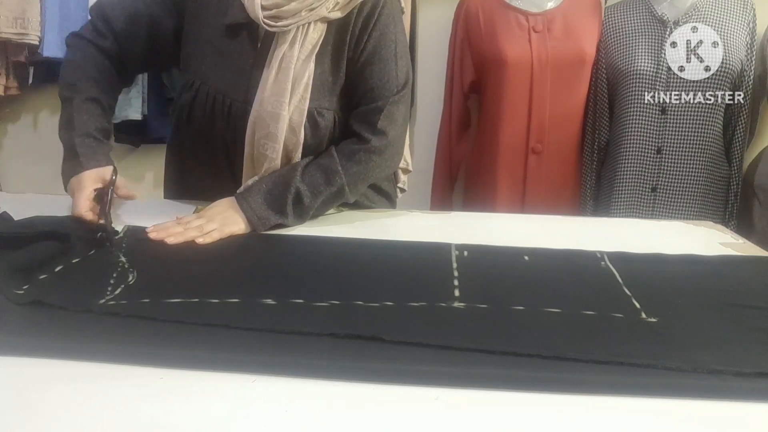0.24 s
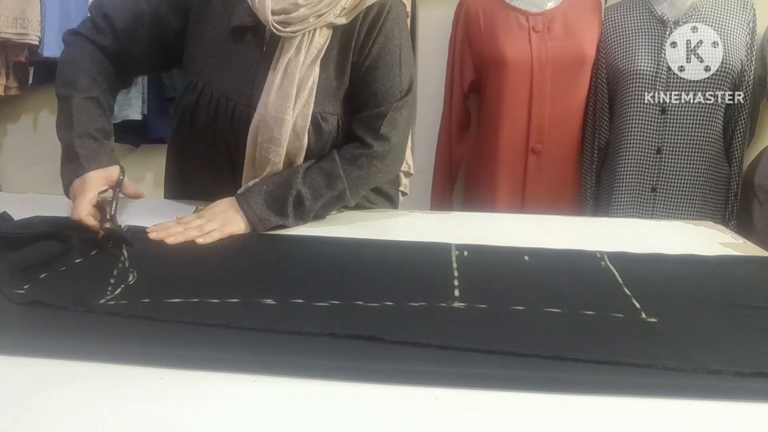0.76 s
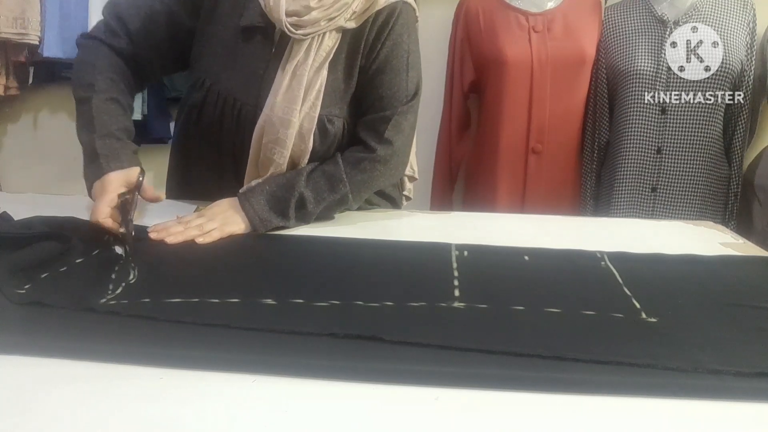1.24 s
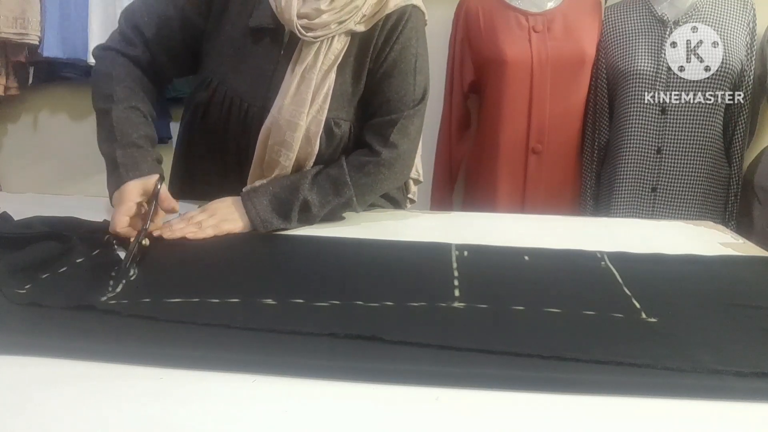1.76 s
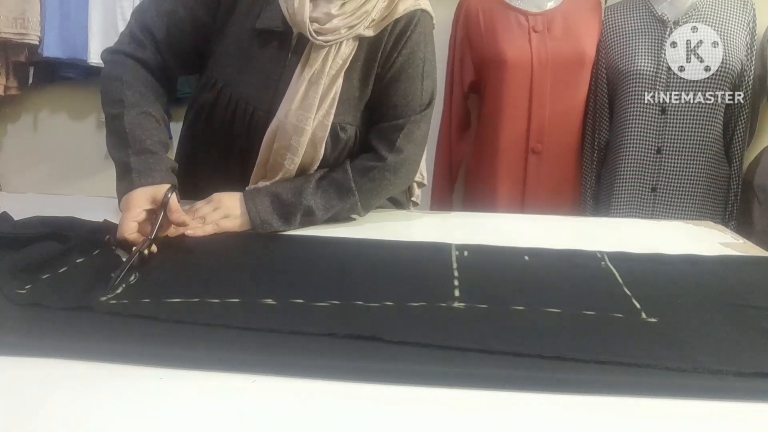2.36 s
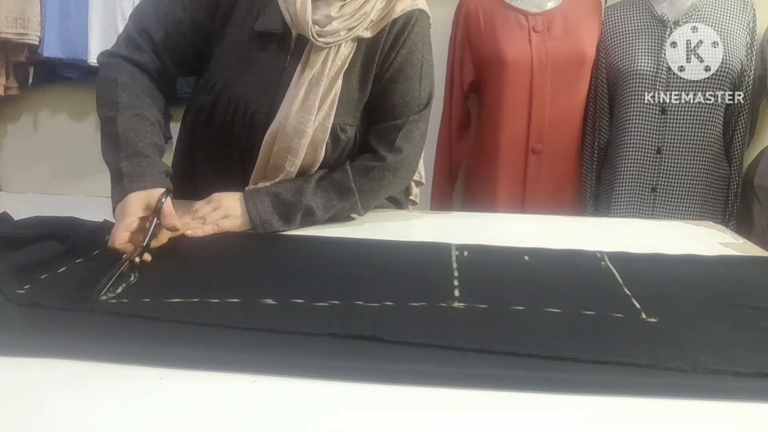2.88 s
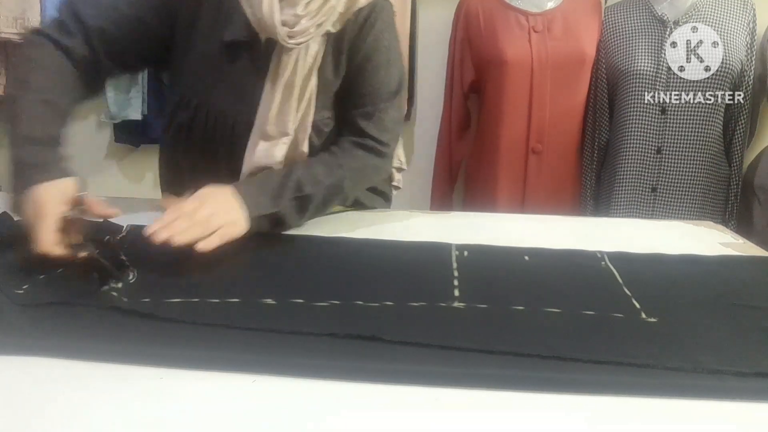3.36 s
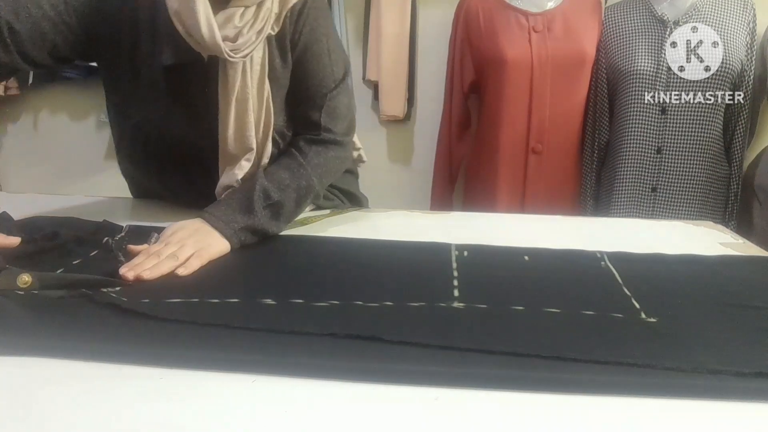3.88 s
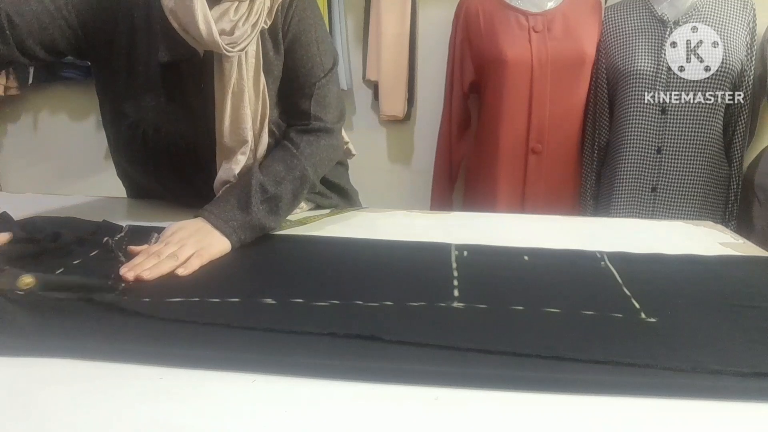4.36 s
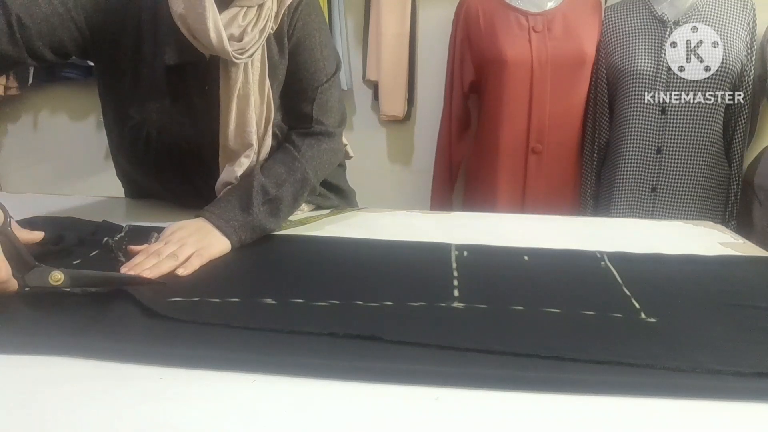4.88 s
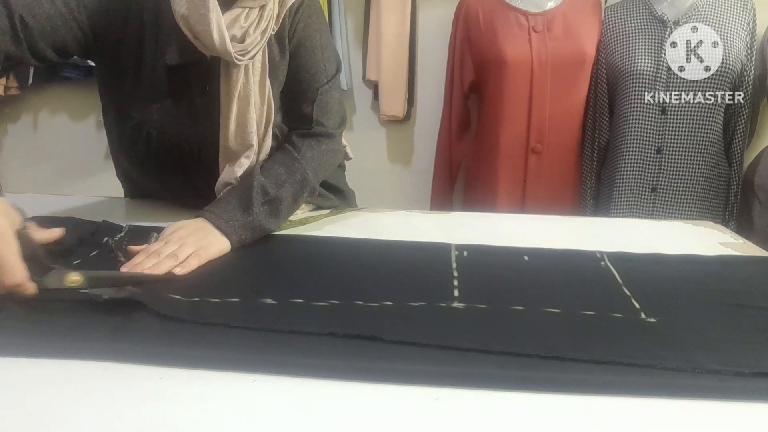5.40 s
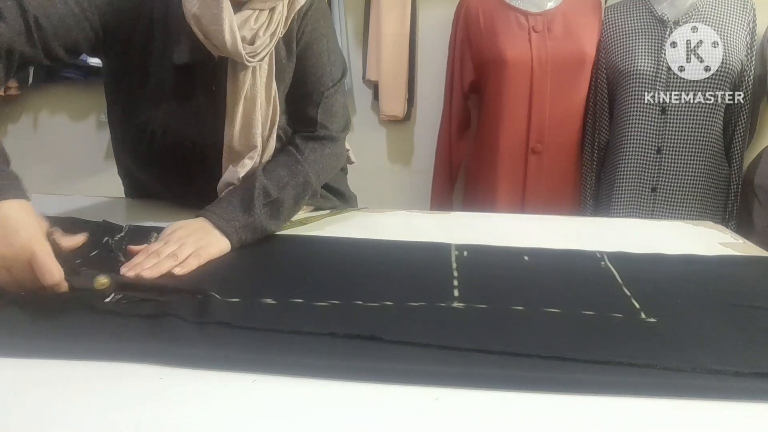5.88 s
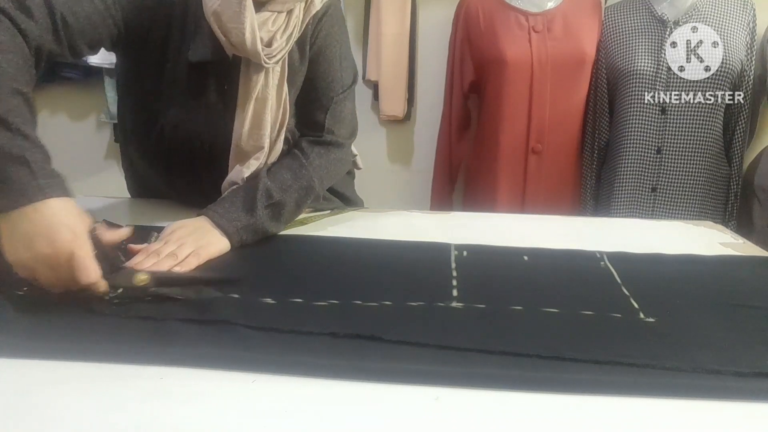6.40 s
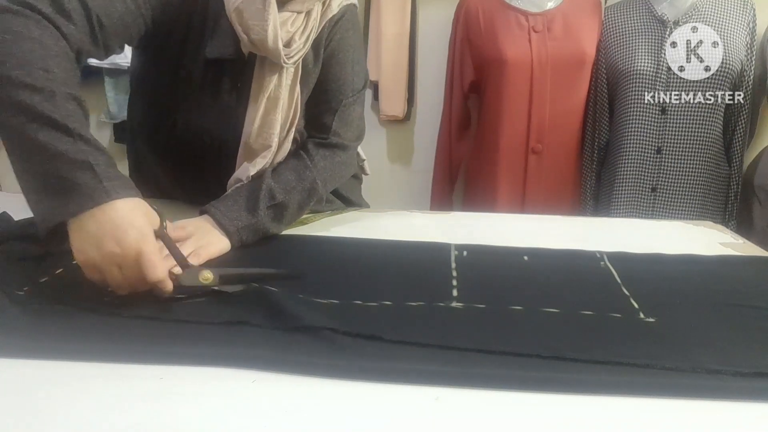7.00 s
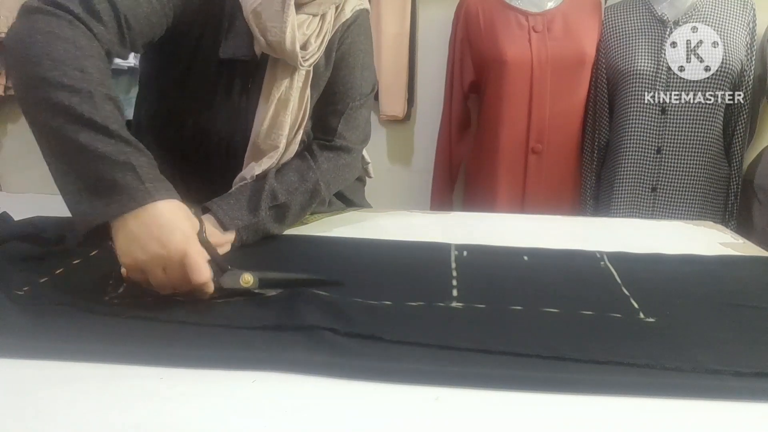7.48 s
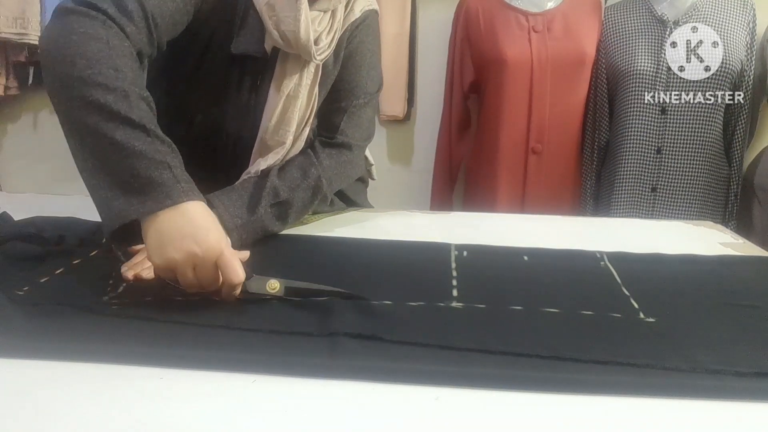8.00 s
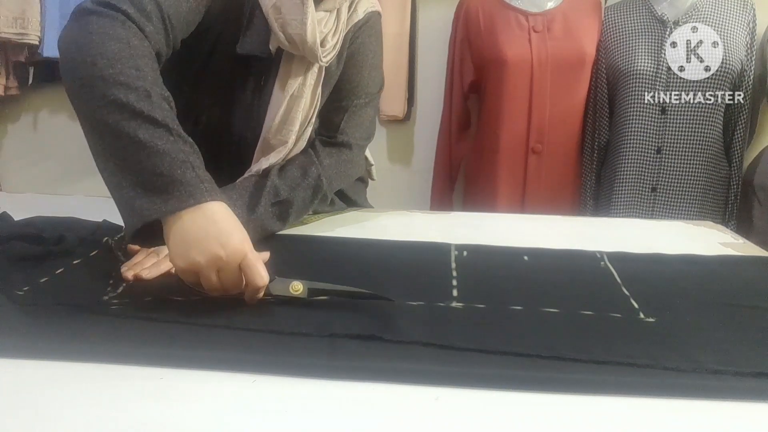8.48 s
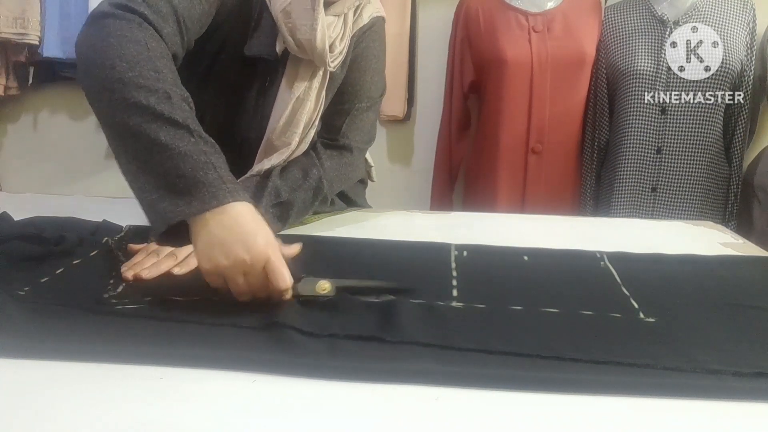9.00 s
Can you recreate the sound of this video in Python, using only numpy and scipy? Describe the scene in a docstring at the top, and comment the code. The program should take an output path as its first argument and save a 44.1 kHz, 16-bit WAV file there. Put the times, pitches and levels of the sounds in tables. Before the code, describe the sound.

In a small room with faint steady air, large shears cut cloth on a wooden table, heard close in stereo and slightly right of centre. From 0.1 to 3.1 seconds, eight strokes come roughly every 0.45 seconds: a soft nip, then a brief gritty crunch of tiny uneven snaps, tabletop drumming beneath and crisp fibre fizz above, then a quiet steel slide as the blades open. Between 3.3 and 4.1 the cutting pauses; cloth swishes, shears drag and scrape, and a hand bumps softly near 3.6. A ragged, brighter stroke lands at 4.2, with slight shifting after, another at 5.2, then a stronger drag and scrape around 5.6. From 5.7 strokes continue regularly, about every 0.45 seconds, fuller in the midrange later and drifting slightly left, with the last cut at 8.9, a blade opening, and a final light nip near 9.2. Echoes are short and dry.

```python
"""In a small room, large tailor's shears cut through cloth on a table: eighteen strokes, a pause to turn the corner.
In each stroke the blades nip the cloth, crunch through its threads while the table drums, and scrape open again.
The cutting sounds are showers of tiny snaps, swelling with the force of the blades and ringing in steel and wood.
Cloth and shears are dragged by hand, a hand bumps the table, and the air of the room hushes faintly throughout.
The sound moves from slightly right of the middle to slightly left of it."""
import sys
import numpy as np
from scipy import signal
from scipy.fft import rfft, irfft, next_fast_len
from scipy.io import wavfile
from scipy.ndimage import map_coordinates

SR = 44100
rng = np.random.default_rng(int(sys.argv[2]) if len(sys.argv) > 2 else 0)


def generate_wav(sig):
    """Save sig (samples, or channels by samples) to the path in sys.argv[1] as 16-bit PCM at SR."""
    pcm = np.round(np.clip(np.atleast_2d(sig).T, -1, 1) * 32767).astype(np.int16)
    wavfile.write(sys.argv[1], SR, pcm)


N = 407925
TIME = np.arange(N) / SR  # seconds

# Levels in the tables are relative: each layer also has its own gain further down.
# Blades closing on the cloth just before a cut. Each row: time in seconds, level in dB.
NIPS = [(0.092, -54), (0.548, -54.5), (0.974, -52), (1.448, -56), (1.879, -55), (2.263, -58), (2.698, -54),
        (3.026, -56.5), (4.161, -57.5), (5.164, -56), (5.705, -71), (6.229, -54), (6.69, -50.5),
        (7.143, -53.5), (7.563, -56), (7.97, -49.5), (8.385, -52.5), (8.827, -63), (9.24, -55.5)]
# Cutting strokes. Each row: start in seconds, length in seconds, moment of the hardest snag in seconds,
# time between snags in seconds, snags over the steady force in dB, level in dB,
# blade knock over that level in dB, blade note in Hz.
STROKES = [(0.121, 0.08084, 0.1597, 0.02915, 16.5, -39, -3, 1250),
           (0.564, 0.0844, 0.5929, .019, 13.5, -39.5, -2.5, 1160),
           (1.011, 0.069, 1.0547, 0.01636, 14, -39.5, -1, 1300),
           (1.465, 0.061, 1.5173, .0215, 15, -41, 2, 1160),
           (1.903, 0.061, 1.9419, .0177, 15.5, -39.5, -1.5, 1167),
           (2.303, 0.065, 2.339, 0.0286, 8, -38, -6, 1096), (2.72, 0.07, 2.779, .026, 16, -39, -5.5, 796),
           (3.057, 0.046, 3.0798, .016, 16, -40, -9.5, 880),
           (4.176, 0.12, 4.2391, .027, 22.5, -42, -1.5, 1095),
           (5.201, 0.077, 5.2832, .0187, 21.5, -39.5, 0, 1074),
           (5.744, 0.097, 5.7985, 0.02217, 17.5, -41.5, -0.5, 1150),
           (6.262, 0.0747, 6.32, 0.01554, 18, -39.5, 1.5, 1110),
           (6.717, 0.0627, 6.7635, 0.0153, 10.5, -38.5, -0.5, 1114),
           (7.163, 0.069, 7.2133, 0.02214, 14.5, -38, -0.5, 1123),
           (7.586, 0.072, 7.644, 0.01665, 11.5, -38.5, -2, 822),
           (8.009, 0.0564, 8.0437, 0.02866, 16, -39, -1.5, 803),
           (8.41, 0.054, 8.446, 0.026, 16, -39.5, -4, 802.5),
           (8.862, 0.064, 8.901, .031, 13, -39.5, -1.5, 1200)]
# Blades sliding open after a cut. Each row: time in seconds, level in dB.
OPENINGS = [(0.329, -60), (0.785, -62.5), (1.233, -65.5), (1.694, -67.5), (2.131, -68.5), (2.546, -65.5),
            (2.934, -70), (3.276, -67), (4.431, -62), (5.425, -63.5), (5.978, -62.5), (6.474, -61.5),
            (6.921, -60), (7.376, -60.5), (7.808, -63), (8.217, -66.5), (8.633, -66.5), (9.066, -59)]
# Cloth and shears shifted over the table. Each row: time of the peak in seconds, time to rise by 60 dB in
# seconds, time to fall by 60 dB in seconds, drag in dB, scrape in dB, swish in dB.
MOVES = [(3.29, 0.6, 0.55, -83, -76, -73.5), (3.439, .45, .2, -56, -55, -65),
         (3.6, 0.45, .5, -73, -79, -80), (3.771, 0.08, .14, -62.5, -54.5, -68.5),
         (3.92, 0.12, 0.086, -68, -54.5, -75.5), (4.07, 0.0851, 0.0249, -58.5, -68, -88),
         (4.492, .15, 0.24, -65, -57, -80.5), (4.587, 0.7, .06, -63.5, -72, -100),
         (5.58, 0.2, 0.08, -67, -51, -59.5), (5.676, 0.35, 0.23, -50, -49, -76)]
# A hand landing on the table. Each row: time in seconds, level in dB.
BUMPS = [(3.572, -54)]
# Place of the shears. Each row: time in seconds, delay of the left microphone behind the right in
# milliseconds, left level over right in dB.
PLACE = [(0, 0.12, -0.5), (3, 0.16, -1.5), (5.3, 0.1087, -2), (6.3, 0.0825, -0.24), (7.2, 0.044, 1),
         (8, -0.0084, 1.23), (9.2, -0.018, 2.52)]
# Tone of the shears along the way. Each row: time in seconds, crunch around 2 kHz in dB, top treble in dB.
TONE = [(0, -3, -2), (1.9, -4.5, -1), (3.1, 0, -2.5), (4.2, -12.5, 2), (5.3, -9, 3.5), (7.2, -3, 2.5),
        (7.7, -1.5, 0), (9.2, 0.5, -0.5)]

# Force over a cut: hard near the pivot, easing towards the tips. Entries: times in seconds, levels in dB.
BITE = dict(attack=0.013, release=0.0775, start_db=8.5, settle=0.04, level_db=-5.5)
# Tearing of fine fibres, which builds up later in the cut. Entries: times in seconds, levels in dB.
TEAR = dict(attack=.018, release=0.1, start_db=-12, settle=0.025, level_db=-1.5)
# Blade pressure in a nip: it builds up, then slackens. Entries: times in seconds, level in dB.
NIP_PRESSURE = dict(attack=0.093, release=0.18, level_db=-2)
# Blade pressure in an opening, which slackens more slowly. Entries: times in seconds, level in dB.
OPENING_PRESSURE = dict(attack=.12, release=.27, level_db=3)

# Resonances of the tabletop. Each row: pitch in Hz, width in Hz, level in dB.
TABLETOP = [(58.4, 6.6, -9), (97.4, 14, -8), (158.1, 16.8, 1.5), (211, 21, -2), (274, 14.8, 4),
            (343.7, 22.8, -1.5), (390.7, 30, 1.5), (471, 54, -4), (564.7, 39, -1), (614.5, 68, -1.5)]
# Low resonances of the blades. Each row: pitch in Hz, width in Hz, level in dB.
BLADES = [(734, 134, 3.5), (806.5, 107, 6), (1017, 54, -6), (1027, 63, 3.5), (1267, 160, 1.5)]
# Higher resonances of the blades. Each row: pitch in Hz, width in Hz, level in dB.
STEEL = [(1402, 158, 4.5), (1572, 51, 4), (1875, 155, 1.5), (2140, 132, 0.5), (2289, 133, 4),
         (2480, 240, 0.5), (2790, 250, -3), (3384, 360, -27.5)]

# Colour of the tearing fibres. Each row: frequency in Hz, level in dB per Hz.
RIP = [(1000, -38.5), (2500, -27), (3300, -3.5), (3900, -1), (4300, -3.5), (5120, 2.5), (5700, -3.5),
       (6700, -3.5), (7400, -11), (8200, -18.5), (12000, -19)]
# Colour of the top treble of the tearing. Each row: frequency in Hz, level in dB per Hz.
FIZZ = [(4000, -62), (7200, -49.5), (8100, -7.5), (9000, 4), (9900, 13.5), (10900, 10.5), (12300, 8.5),
        (14500, 1), (16000, -20.5)]
# Colour of steel rasping on steel. Each row: frequency in Hz, level in dB per Hz.
SCRAPE = [(250, -10), (600, 2), (1000, 8.5), (1300, -7), (1800, -3.5), (2350, -12.5), (3200, -8.5),
          (4200, -27), (5100, -16.5), (6500, -23), (8000, -62), (12000, -80)]
# Colour of the ringing blade edges. Each row: frequency in Hz, level in dB per Hz.
EDGE = [(4000, -91), (5100, -51.5), (6500, -30.5), (8300, -27), (9300, 21.5), (9900, 23.5), (10900, 11),
        (12500, 15), (15500, -1)]
# Colour of brushing cloth. Each row: frequency in Hz, level in dB per Hz.
SWISH = [(1500, -20), (2500, 3.5), (3100, 0.5), (4200, -10), (5200, -6.5), (7800, -22), (10000, -7.5),
         (12500, -17.5), (15500, -24)]
# Colour of the air of the room. Each row: frequency in Hz, level in dB per Hz.
HUSH = [(25, -22), (60, -12.5), (152, -0.5), (300, -3.5), (450, -7), (760, -10.5), (2360, -24.5),
        (6700, -23), (7600, -30.5), (11800, -21.5), (15500, -22.5)]

# Echo of the walls. Each row: frequency in Hz, time to fall by 60 dB in seconds.
ROOM_DECAY = [(60, 0.32), (250, 0.21), (1000, 0.147), (5000, 0.2), (14000, 0.17)]
# Likeness of the left and right echo. Each row: frequency in Hz, likeness from 0 to 1.
ROOM_ALIKE = [(100, 0.94), (300, 0.92), (700, 0.65), (1400, 0.14), (3000, .02)]
# Difference of the two microphones. Each row: frequency in Hz, left level over right in dB.
MIC_BALANCE = [(150, -1.5), (300, -0.42), (1000, -2.5), (1950, 1.5), (3200, -1), (4800, -0.5), (7000, -1),
               (9200, -2), (9900, -2.5), (11000, 1.5), (15000, -1)]

TOP_HZ = 15750  # nothing is kept from here up
RIP_FOLLOWS, RING_FOLLOWS = 0.25, 2.2  # dB of rip per dB of crunch; dB of edge ring per dB of top treble
SNAG_SCATTER_S = 0.00063  # unevenness of the pace of the snags
SNAG_GROWTH_DB, HARDEST_DB = 6.5, 2.5  # growth over the length of a stroke; extra for its hardest snag
ENTRY_S, ENTRY_DB = 0.0039, 8.5  # the edges first break into the cloth just after a stroke begins


def amp(db):
    """Turn decibels into gain."""
    return 10 ** (np.asarray(db) / 20)


def unit(x):
    """Scale to an rms (average strength) of 1."""
    return x / np.sqrt(np.mean(x ** 2) + 1e-20)


def along(points, hz):
    """Read a table of (Hz, value) between its points, on a log frequency axis."""
    f, v = np.transpose(points)
    return np.interp(np.log(hz + 1), np.log(f), v)


def filtered(x, response):
    """Shape x by a response, given as a function of frequency."""
    size = 2 * next_fast_len(N // 2 + SR // 4)
    hz = np.fft.rfftfreq(size, 1 / SR)
    return irfft(rfft(x, size) * response(hz), size)[..., :N]


def colour(points):
    """Response of unit power that follows a spectrum and never sounds before its cause."""
    def response(hz):
        # folding the cepstrum forward in time gives the matching phase
        cepstrum = irfft(np.log(amp(along(points, hz))))
        cepstrum[1:len(hz) - 1] *= 2
        cepstrum[len(hz):] = 0
        gain = np.exp(rfft(cepstrum))
        return gain / np.sqrt(np.mean(np.abs(gain) ** 2))
    return response


def body(modes):
    """Response of unit power of an object that rings at a set of resonances with alternating signs."""
    def response(hz):
        gain = 0
        for k, (centre, width, db) in enumerate(modes):
            damping = 1j * hz * width
            gain = gain + (-1) ** k * amp(db) * damping / (centre ** 2 - hz ** 2 + damping)
        return gain / np.sqrt(np.mean(np.abs(gain) ** 2))
    return response


def low_pass(x, edge_hz):
    """Cut the treble steeply."""
    return signal.sosfilt(signal.butter(4, edge_hz, fs=SR, output="sos"), x)


def snaps(rate, spread_db):
    """Tiny impulses of uneven size at random moments, `rate` per second on average, rms 1."""
    sizes = np.sign(rng.standard_normal(N)) * amp(spread_db * rng.standard_normal(N))
    return unit(sizes * (rng.random(N) < rate / SR))


def envelope(start, hold, attack, release, start_db=0, settle=1, level_db=0):
    """Gain that rises 60 dB in the attack, settles from its starting level, and falls 60 dB in the release."""
    span = slice(max(0, int((start - attack) * SR)), int((start + hold + release) * SR))
    t = TIME[span] - start
    ramps = np.minimum(t, 0) / attack - np.maximum(t - hold, 0) / release
    settling = amp(level_db + start_db * np.exp(-np.maximum(t, 0) / settle))
    gain = np.zeros(N)
    gain[span] = settling * np.exp(np.log(1000) * ramps)  # a factor of 1000 is 60 dB
    return gain


def stretches(rows):
    """Split the time into one (start, stop) stretch of samples per row, from 0.1 s before each event."""
    edges = [0] + [int((row[0] - .1) * SR) for row in rows[1:]] + [N]
    return list(zip(edges, edges[1:]))


def tone(times):
    """Levels of the crunch and of the top treble at these moments, in dB."""
    s, crunch_db, top_db = np.transpose(TONE)
    return np.interp(times, s, crunch_db), np.interp(times, s, top_db)


def cutting_note(x, rows, width_hz):
    """The point where the blades touch sets the note at which they ring, anew at each contact."""
    out = np.zeros(N)
    for (start, stop), row in zip(stretches(rows), rows):
        note_hz = row[-1]
        b, a = signal.iirpeak(note_hz, note_hz / width_hz, SR)
        once = signal.lfilter(b, a, x[start:stop])
        twice = signal.lfilter(b, a, once)
        out[start:stop] = unit(twice) * np.std(x[start:stop])
    return out


def room_hush(level_db, apart):
    """The faint steady air of the room: coloured noise, partly different on the two sides."""
    mid, side = filtered(rng.standard_normal((2, N)), colour(HUSH))
    return amp(level_db) * unit(np.array([mid + apart * side, mid - apart * side]))


def blade_rub(rows, pressure, lead, hold, tick, note_hz, table_db, scrape_db, note_db, ring_db):
    """Steel slips on steel in tiny jerks: the table hums, the blades rasp and their edges ring."""
    slips = snaps(rate=900, spread_db=7)
    for s, _ in rows:
        slips[int(s * SR)] += tick  # the play in the pivot is taken up with a tick
    rub = slips * sum(amp(db) * envelope(s - lead, hold, **pressure) for s, db in rows)
    table = low_pass(filtered(rub, body(TABLETOP)), edge_hz=1300)
    rasp = filtered(rub, colour(SCRAPE))
    steel = filtered(rub, body(STEEL))
    note = cutting_note(rub, [(s, note_hz) for s, _ in rows], width_hz=380)
    top_db = tone(TIME)[1]
    ring = filtered(rub * amp(RING_FOLLOWS * top_db), colour(EDGE))
    return (amp(table_db) * table
            + amp(scrape_db) * (rasp + amp(-10.5) * steel)
            + amp(note_db) * note
            + amp(ring_db) * ring)


def snags():
    """The blades break in, then stick and slip at a nearly even pace: (s, dB) of each bunch giving way."""
    steps = np.arange(-6, 7)  # counted from the hardest snag
    found = []
    for s, length, hardest, spacing, snag_db, *_ in STROKES:
        times = hardest + steps * spacing + SNAG_SCATTER_S * rng.standard_normal(len(steps))
        share = (times - s) / length  # 0 where the stroke starts, 1 at its end
        levels = snag_db + SNAG_GROWTH_DB * (share - .5) + HARDEST_DB * (steps == 0)
        found.append((s + ENTRY_S, ENTRY_DB))
        found += [(t, db) for t, db, u in zip(times, levels, share) if .06 < u < 1.2]
    return found


def snag_force(bunches, width, slack_db):
    """The cutting force peaks around each bunch of threads that gives way; `width` is in seconds."""
    force = np.full(N, amp(slack_db))
    for s, db in bunches:
        near = slice(int((s - .02) * SR), int((s + .02) * SR))
        force[near] += amp(db) * np.exp(-((TIME[near] - s + width / 2) / width) ** 2)
    return force


def strokes(threads, shape):
    """Each stroke parts a run of threads, with a force that rises and falls."""
    return threads * sum(envelope(s, length, **shape) for s, length, *_ in STROKES)


def stroke_strength(x, levels_db):
    """Give each stroke its own level over its length."""
    parts = []
    for (start, stop), row, db in zip(stretches(STROKES), STROKES, levels_db):
        share = row[1] * SR / (stop - start)  # part of the stretch that the stroke lasts
        parts.append(amp(db) * unit(x[start:stop]) * np.sqrt(share))
    return np.concatenate(parts)


def cutting():
    """Snapping threads knock the blades and the table; finer fibres tear as the cut nears the tips."""
    starts, *_, level_db, knock_db, _ = np.transpose(STROKES)
    crunch_db, top_db = tone(starts)
    bunches = snags()
    threads = snag_force(bunches, width=0.0023, slack_db=2.0) * snaps(rate=1000, spread_db=4.5)
    # the fibres of a bunch fray over a longer moment than its threads snap
    fibres = snag_force(bunches, width=0.0028, slack_db=10.0) ** 0.83 * snaps(rate=2600, spread_db=5.5)
    blows = strokes(threads, BITE)
    fraying = strokes(0.39 * threads + fibres, TEAR)

    # parting threads push the table mostly one way, so a stroke thumps as well as rattles
    push = blows + .5 * np.abs(blows)
    table = low_pass(filtered(push, body(TABLETOP)), edge_hz=900)
    note = cutting_note(blows, STROKES, width_hz=217)
    knock = low_pass(filtered(blows, body(BLADES)) + 1.08 * note, edge_hz=1200)
    crunching = strokes(threads + 0.76 * fibres, BITE) + .5 * fraying
    crunch = low_pass(filtered(crunching, body(STEEL)), edge_hz=3200)
    rip = filtered(fraying, colour(RIP))
    fizz = filtered(fraying, colour(FIZZ))
    return (amp(0.5) * stroke_strength(table, level_db)
            + amp(1.0) * stroke_strength(knock, level_db + knock_db)
            + amp(-.7) * stroke_strength(crunch, level_db + crunch_db)
            + amp(-10.0) * stroke_strength(rip, level_db + RIP_FOLLOWS * crunch_db)
            + amp(-15.0) * stroke_strength(fizz, level_db + top_db))


def shifting():
    """Cloth swishes and the shears drag as they are brought to a new line; each move swells and dies away."""
    drag, scrape, swish = sum(amp(levels_db)[:, None] * envelope(s, 0, rise, fall)
                              for s, rise, fall, *levels_db in MOVES)
    slips = snaps(rate=1500, spread_db=5)
    brushing = snaps(rate=13000, spread_db=4)
    # resonances as (Hz, width in Hz, dB)
    dragged_table = body([(156.4, 22, -0.5), (286, 23.8, 7.5), (421, 110, -1.5)])
    scraped_blades = body([(590, 59, -5.5), (983, 71, 5), (1440, 320, -5.5),
                           (1639, 360, -8.0), (2370, 280, -17.0)])
    table = low_pass(filtered(drag * slips, dragged_table), edge_hz=480)
    rasp = filtered(scrape * slips, scraped_blades)
    cloth = filtered(swish * brushing, colour(SWISH))
    return amp(-1.0) * table + amp(-4.5) * rasp + amp(1.0) * cloth


def hand_bump(t60, attack, soft_hz, gain_db):
    """A soft hand wakes mainly the lowest resonances of the table; higher ones die away sooner."""
    out = np.zeros(N)
    t = np.arange(SR // 2) / SR
    for s, db in BUMPS:
        ring = np.zeros(len(t))
        for hz, _, _ in TABLETOP:
            decay = amp(-60 * t / t60 * np.sqrt(hz / soft_hz))
            ring += np.sin(2 * np.pi * hz * t) * decay / (1 + (hz / soft_hz) ** 2)
        out[int(s * SR):][:len(t)] += amp(db + gain_db) * ring * (1 - np.exp(-t / attack))
    return out


def placed(x):
    """The sound reaches the two microphones at moments and levels that follow the shears."""
    s, delay_ms, balance_db = np.transpose(PLACE)
    delay = np.interp(TIME, s, delay_ms) / 1000
    balance = np.interp(TIME, s, balance_db)
    # left, then right: each takes half of the difference
    return np.array([amp(side * balance) * map_coordinates(x, [(TIME - side * delay) * SR])
                     for side in (.5, -.5)])


def near_echoes(pair, spread, from_hz, count=7):
    """Close surfaces throw back the treble within milliseconds, differently for each microphone."""
    delays = 0.000644 + spread * rng.random((2, count, 1))  # seconds
    signs = np.sign(rng.standard_normal((2, count, 1)))

    def response(hz):
        treble = hz / np.hypot(hz, from_hz)
        echoes = np.sum(signs * np.exp(-2j * np.pi * hz * delays), axis=1)
        return treble * echoes / np.sqrt(count)
    return filtered(pair, response)


def room_tail(delay, scatter_db, scatter_t60, scatter_hz):
    """One stereo echo: treble scattered off hands and cloth, then the room, its bass alike on both sides."""
    hz, t, noise = signal.stft(rng.standard_normal((2, SR // 2)), SR, nperseg=256)
    turn = np.arccos(np.clip(along(ROOM_ALIKE, hz), 0, 1))[:, None] / 2
    treble = (hz / np.hypot(hz, scatter_hz))[:, None]
    scatter = amp(scatter_db - 60 * t / scatter_t60) * treble
    walls = amp(-60 * t / along(ROOM_DECAY, hz)[:, None]) * (1 - np.exp(-t / delay))
    shares = np.array([np.cos(turn), np.sin(turn)])  # common part, opposite part
    mid, side = signal.istft(noise * (walls + scatter) * shares, SR, nperseg=256)[1]
    tail = np.array([mid + side, mid - side])
    return tail / np.linalg.norm(tail[0])


def room(x):
    """The echo changes from stroke to stroke as the arms and shears move."""
    out = np.zeros((2, N + SR))
    for start, stop in stretches(STROKES):
        tail = room_tail(delay=0.0037, scatter_db=5, scatter_t60=0.026, scatter_hz=3500)
        echo = signal.fftconvolve(x[None, start:stop], tail, axes=1)
        out[:, start:start + echo.shape[1]] += echo
    return out[:, :N]


def scene():
    """Shears, cloth and table, heard directly, off close surfaces and through the room."""
    nips = blade_rub(NIPS, NIP_PRESSURE, lead=0.0038, hold=0.013, tick=22.2, note_hz=1025,
                     table_db=6.0, scrape_db=-3.0, note_db=-1.5, ring_db=-21.5)
    openings = blade_rub(OPENINGS, OPENING_PRESSURE, lead=0.016, hold=0.022, tick=20, note_hz=1055,
                         table_db=-5.5, scrape_db=-2.5, note_db=-1.0, ring_db=-21.5)
    bump = hand_bump(t60=0.212, attack=0.0074, soft_hz=148, gain_db=5)
    work = nips + cutting() + openings + shifting() + bump
    direct = placed(work)
    near = near_echoes(direct, spread=0.0065, from_hz=3000)
    hush = room_hush(level_db=-77.5, apart=0.82)
    return direct + amp(-2.5) * near + amp(1.0) * room(work) + hush


def record(dry):
    """Each microphone has its own colour; nothing is kept above the band limit."""
    def response(hz):
        halves = np.array([[.5], [-.5]])  # left, right
        return amp(along(MIC_BALANCE, hz) * halves) * (hz < TOP_HZ)
    return filtered(dry, response)


dry = scene()
out = record(dry)
generate_wav(out)
```